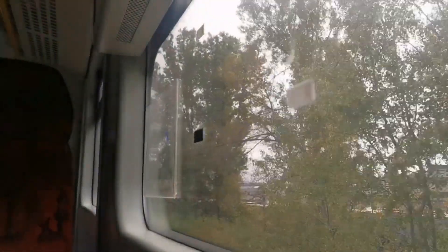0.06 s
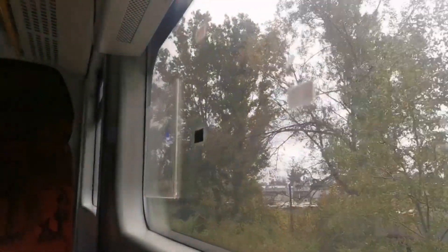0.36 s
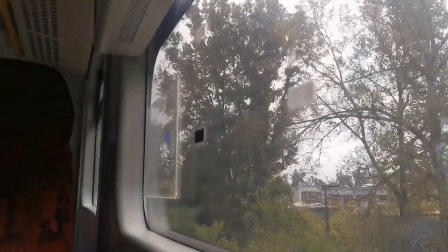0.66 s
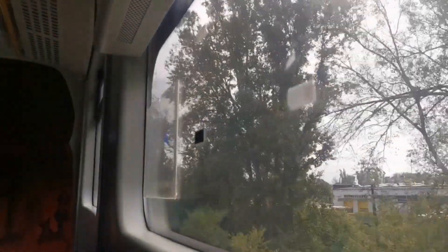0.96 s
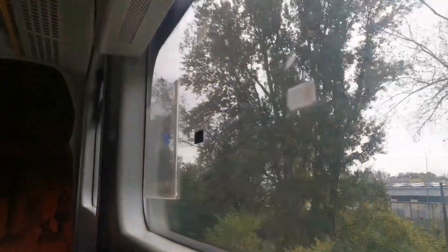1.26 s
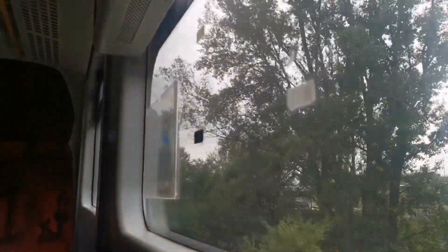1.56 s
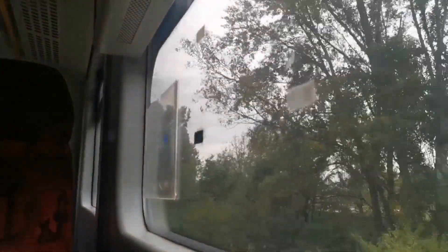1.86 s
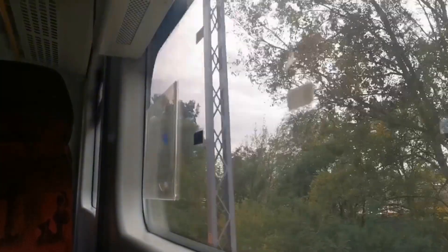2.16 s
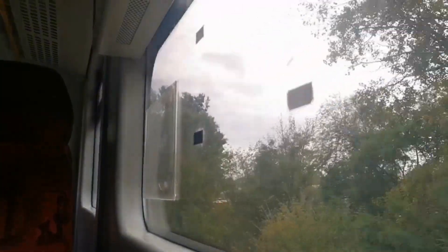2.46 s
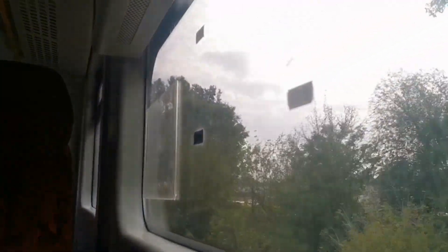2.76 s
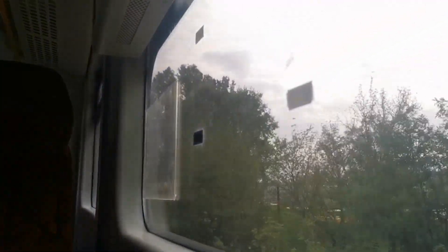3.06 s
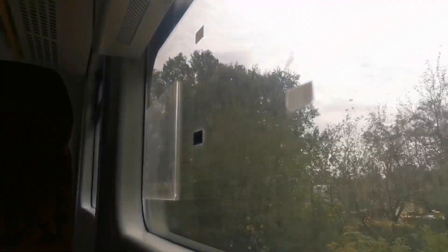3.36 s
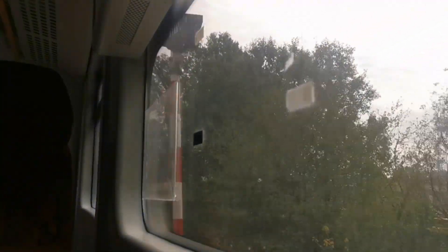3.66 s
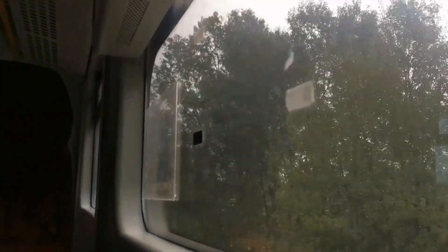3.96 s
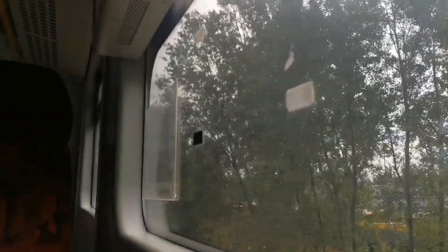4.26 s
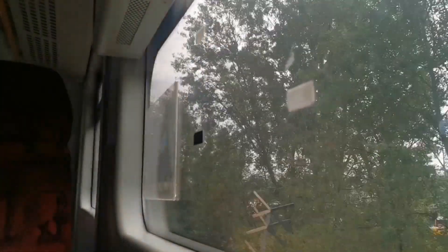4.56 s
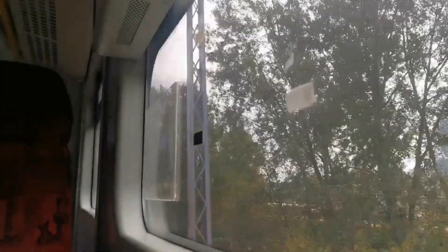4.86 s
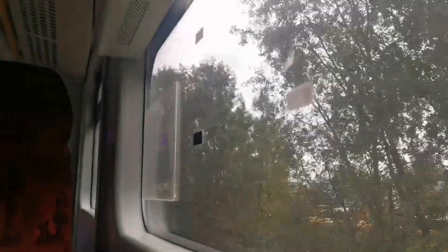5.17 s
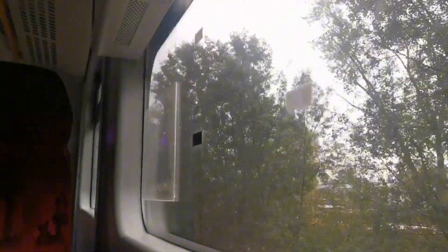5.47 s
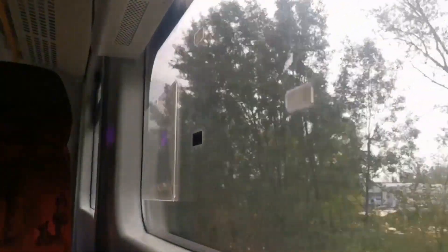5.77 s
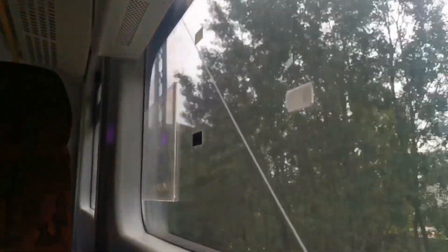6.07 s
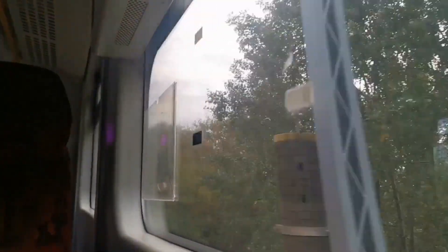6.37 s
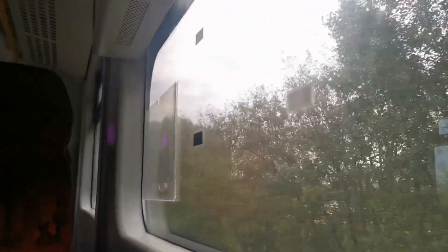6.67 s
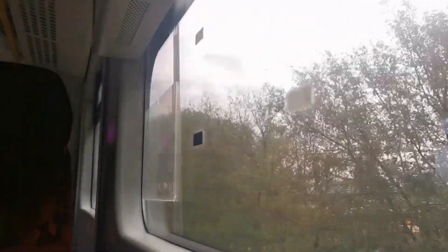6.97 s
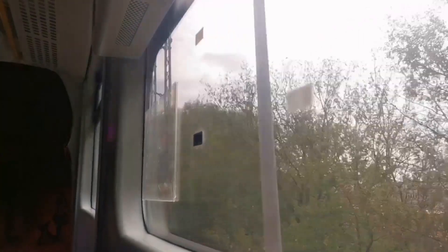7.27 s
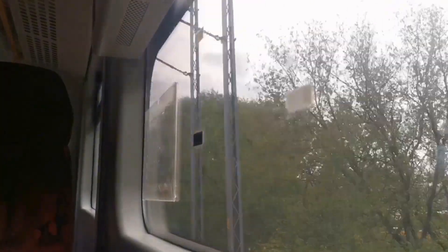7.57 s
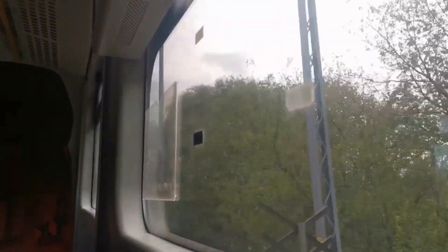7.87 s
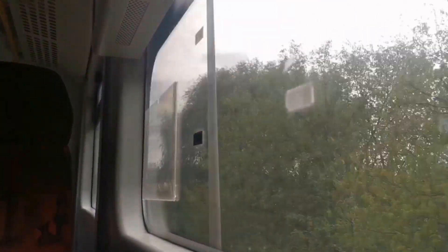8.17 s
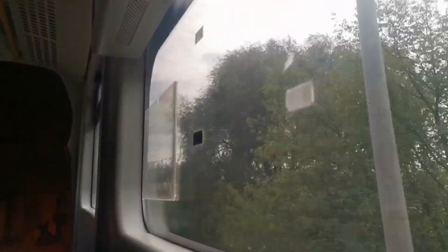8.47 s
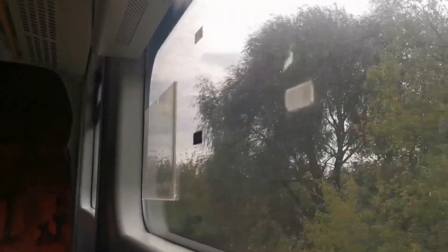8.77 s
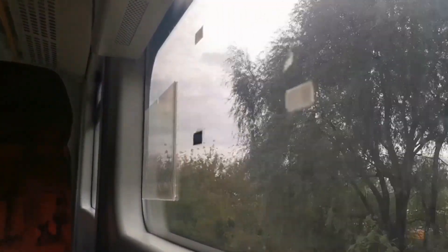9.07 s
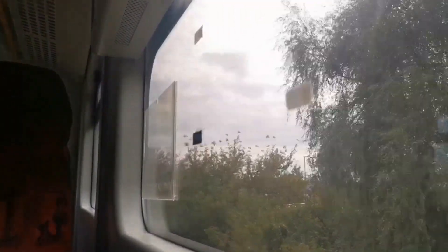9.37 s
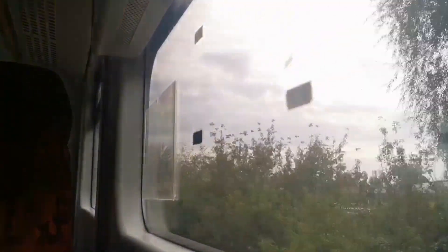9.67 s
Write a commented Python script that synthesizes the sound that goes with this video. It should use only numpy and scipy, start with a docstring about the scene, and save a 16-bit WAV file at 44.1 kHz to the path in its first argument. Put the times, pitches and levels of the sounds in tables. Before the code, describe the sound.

A commuter train's low rumble and electrical hum heard from a window seat, with soft bumps and a loose fitting ticking now and then.

```python
"""Running gear rumbles through the floor and wall panels of an electric commuter train at steady speed.
Heard from a window seat, bumps in the rail make the panels boom, an auxiliary motor and the
mains-fed equipment hum, and an inverter whines high up on the right. The wheels roar dully behind
the glass, a loose fitting ticks now and then, and a thin hiss sits on top."""
import sys
import numpy as np
from scipy import signal
from scipy.fft import rfft, irfft, next_fast_len
from scipy.io import wavfile
from scipy.ndimage import uniform_filter1d, map_coordinates

SR = 44100
rng = np.random.default_rng(int(sys.argv[2]) if len(sys.argv) > 2 else 0)


def wav_record(signal):
    """Record a signal, one row per channel, as 16-bit PCM in the file named by sys.argv[1]."""
    frames = np.transpose(np.atleast_2d(signal))
    bounded = np.clip(frames, -1, 1)
    # unit amplitude maps onto the largest positive 16-bit level
    quanta = np.round(bounded * 32767).astype(np.int16)
    wavfile.write(sys.argv[1], SR, quanta)


N = 433496

# Tone colour of the body's sway, the floor's boom and the walls' drone: freq_hz, relative_db
BODY_SPECTRUM = [(6, -12), (11, 16), (14, 28.5), (21, 31), (27, 29), (33, 24), (42, 27), (52, 6), (65, -51)]
FLOOR_SPECTRUM = [(38, -44), (48, 18), (54, 15.5), (64, 21), (70, 6.5), (77, 15.5), (86, 12.5), (94, 15.5),
                  (104, 13), (125, -51.5)]
WALL_SPECTRUM = [(80, -18.5), (102, -1.5), (122, -0.5), (135, -3.5), (160, -8.5), (180, -7), (197, -2),
                 (217, -5.5), (236, -11), (272, -13.5), (296, -11), (316, -19.5), (345, -23), (450, -73)]
# Wavering notes of wheelsets and gears, set against the noise around them: pitch_hz, relative_db
WHEEL_NOTES = [(14.57, -2), (31.87, -3.5), (33.77, -5.5)]
AXLE_NOTES = [(54.64, -3.5), (63.5, -9), (65.2, -3.5), (81.4, -13.5)]
GEAR_NOTES = [(175.2, -13), (178.4, -12)]
# Level rides for the track's unevenness, the floor's boom and the walls' drone: time_s, gain_db
TRACK_RIDE = [(0.0, 3), (1.65, -7), (2.25, 1), (3.3, -4.7), (4.5, -5), (5.85, 2), (7.2, -1.5), (7.65, 7),
              (8.1, 2.5), (8.4, 10), (9.15, 3.5), (9.83, 2)]
FLOOR_RIDE = [(0.0, -2), (1.05, -3), (1.5, -4), (1.95, -0.5), (2.4, -3), (2.7, 0.8), (3.3, -2.5),
              (3.45, 0.5), (6.15, -1.3), (6.3, -7.1), (6.6, 4), (6.9, -0.5), (7.65, 1.9), (7.8, -3.5),
              (8.25, 1.8), (9.15, 0.8), (9.45, 3.5), (9.83, -1.5)]
WALL_RIDE = [(0.0, -1), (0.45, 0.9), (2.85, -0.73), (5.4, 1.56), (7.05, -1), (9.83, -0.5)]

def rumble(body_db=-32, floor_db=-27, wall_db=-30):
    """The track shakes the body, floor and wall panels; wheelsets and gears add low wavering notes."""
    body_gain = amp(body_db + ride(TRACK_RIDE)) * swelling(depth_db=0.3, rate_hz=5.7)
    sway = body_gain * shaking(BODY_SPECTRUM, WHEEL_NOTES)
    floor_gain = amp(floor_db + ride(FLOOR_RIDE)) * swelling(depth_db=1.3, rate_hz=9)
    boom = floor_gain * shaking(FLOOR_SPECTRUM, AXLE_NOTES)
    wall_gain = amp(wall_db + ride(WALL_RIDE)) * swelling(depth_db=0.93, rate_hz=7)
    drone = wall_gain * shaking(WALL_SPECTRUM, GEAR_NOTES)
    return sway + boom * pan(balance_db=-2) + drone * pan(balance_db=-4.5)


# Panel booms from jolts at the wheels: start_s, pitch_hz, peak_db
BUMPS = [(0.5, 200, -25), (3.76, 190, -26), (4.105, 196, -21), (4.77, 198, -26), (4.86, 196, -26),
         (9.08, 112, -14.5), (9.14, 110, -16.5), (9.215, 178, -20), (9.272, 114, -16.5), (9.295, 185, -19)]

def bumps(rise_s=0.02):
    """Uneven rail jolts the car and a panel booms for a few cycles."""
    out, t = np.zeros(N + SR), np.arange(SR // 2) / SR
    rise = t / rise_s
    swell = rise ** 2 * np.exp(2 * (1 - rise))  # peaks at 1 after rise_s
    for start_s, pitch_hz, peak_db in BUMPS:
        out[round(start_s * SR):][:len(t)] += amp(peak_db) * swell * np.sin(2 * np.pi * pitch_hz * t)
    return out[:N] * pan(balance_db=-1.5)


# Partials of the motor's drone: harmonic, left_db, right_db
MOTOR_PARTIALS = [(1, -22, -22.5), (2, -37.5, -42), (3, -48, -47), (4, -45.5, -41), (5, -52.5, -45),
                  (11, -73, -67.5), (12, -80, -72), (13, -65.5, -55.5)]
# Level ride of that drone: time_s, gain_db
MOTOR_RIDE = [(0.0, 0.6), (2.55, 1), (4.65, -1), (5.1, 1.5), (5.7, -3.0), (9.83, 2.5)]
MOTOR_HZ = 49.02

def motor():
    """The auxiliary induction motor drones, slipping just behind the mains frequency."""
    return amp(ride(MOTOR_RIDE)) * partials(MOTOR_HZ, MOTOR_PARTIALS, waver_db=0.6, drift_rad=0.037,
                                            rate_hz=2.59)


# Low hum, high buzz and rectifier tone of the mains: harmonic, left_db, right_db
HUM_PARTIALS = [(2, -27.5, -26.5)]
BUZZ_PARTIALS = [(17, -77, -67), (26, -75, -73), (48, -83, -80), (49, -85, -72.5), (50, -85, -74),
                 (51, -78, -75), (52, -75.5, -68.8), (54, -78, -77), (70, -83, -80), (72, -78, -68.6),
                 (74, -77, -81), (76, -77, -74), (122, -96, -81)]
RECTIFIER_PARTIALS = [(6, -44.5, -39.5)]

def mains_hum(mains_hz=50, throb_hz=2.3, throb_depth=0.27, throb_peak_s=0.336):
    """Mains-fed gear throbs; its buzz swells with the inverter, its rectifier with the walls' drone."""
    throb = 1 + throb_depth * np.cos(2 * np.pi * throb_hz * (np.arange(N) / SR - throb_peak_s))
    hum = partials(mains_hz, HUM_PARTIALS, waver_db=0.74, drift_rad=0.017, rate_hz=3.4)
    buzz = partials(mains_hz, BUZZ_PARTIALS, waver_db=1.2, drift_rad=0.15, rate_hz=3)
    rectifier = partials(mains_hz, RECTIFIER_PARTIALS, waver_db=1.4, drift_rad=0.1, rate_hz=7.3)
    return throb * hum + amp(0.5 * ride(INVERTER_RIDE)) * buzz + amp(1.43 * ride(WALL_RIDE)) * rectifier


# The inverter's whine and its upper sidebands: harmonic, left_db, right_db
WHINE_PARTIALS = [(12, -82, -68.5), (17, -93, -74), (18, -71.5, -65), (24, -77, -74), (27, -93, -75.5),
                  (30, -77, -50.8), (33, -110, -79), (39, -87, -70.5)]
SIDEBAND_PARTIALS = [(29, -95, -84), (34, -101, -78), (35, -97, -75), (36, -76, -58.9), (37, -115, -73),
                     (38, -104, -78)]
# Level rides of the two: time_s, whine_gain_db, sideband_gain_db
INVERTER_RIDE = [(0, -1.5, -7), (1, 1.5, -6), (2.2, 0.2, -3), (3, 0.7, -6), (4.6, 0.5, 2), (5.5, 1, 1),
                 (6.35, 0.1, 5), (7.75, -0.5, -2), (8.3, -2.8, 2), (9.3, -0.3, 0), (9.83, -3.5, -5)]

def inverter(base_hz=400.046):
    """The inverter whines in high harmonics that reach the right ear first."""
    whine = partials(base_hz, WHINE_PARTIALS, waver_db=0.45, drift_rad=0.15, rate_hz=20, lag_s=6e-5)
    sidebands = partials(base_hz, SIDEBAND_PARTIALS, waver_db=0.6, drift_rad=0.2, rate_hz=4, lag_s=2e-5)
    return amp(ride(INVERTER_RIDE)) * whine + amp(ride(INVERTER_RIDE, column=2)) * sidebands


# Muffled wheel roar and ring of the rail: freq_hz, left_db_per_hz, right_db_per_hz
ROAR_SPECTRUM = [(202, -110, -110), (339, -74, -70), (350, -69, -64.5), (385, -76, -67),
                 (554, -79.5, -68.5), (753, -85, -75), (804, -85.5, -73), (980, -86, -81),
                 (1130, -88.5, -76.5), (1170, -90, -82), (1292, -89, -78), (1613, -95, -88),
                 (2260, -96.5, -91.5), (4800, -140, -140)]
RAIL_SPECTRUM = [(350, -140, -140), (686, -85, -82), (787, -95, -76.5), (945, -97, -85), (1700, -140, -140)]

def rolling(rough_centre_s=7.34, rough_half_s=0.24, rough_lift_db=10.5):
    """Wheels roar behind the glass; the rail rings louder on uneven track and a corrugated stretch."""
    corrugation = np.exp(-((np.arange(N) / SR - rough_centre_s) / rough_half_s) ** 2)
    roar = swelling(depth_db=0.41, rate_hz=13) * rush(ROAR_SPECTRUM)
    rail = amp(0.4 * ride(TRACK_RIDE) + rough_lift_db * corrugation) * rush(RAIL_SPECTRUM)
    return roar + rail


# Hits of the loose fitting: start_s, snap_db, ring_db, clack_db, balance_db, t60_s, attack_s
TICKS = [(3.635, -57, -61, -73, -11, .22, .012), (6.422, -62, -69, -80, -10, .12, .001),
         (6.624, -60, -67, -78, -15, .15, .005), (7.354, -61, -69, -82, -14, .05, .001),
         (7.862, -60, -66, -80, -14, .05, .002), (7.886, -56, -65, -80, -14, .03, .002),
         (7.894, -50, -60, -78, -12, .03, .002), (7.906, -55, -66, -80, -14, .05, .002),
         (8.35, -52, -54.5, -57, -7, 0.17, .0005), (8.491, -59, -56, -43.5, -9.5, 0.31, 0.0017),
         (8.894, -63, -71, -85, -14, .06, .001)]
# Tone colour of a tick's bright snap, metallic ring and low clack: freq_hz, relative_db
SNAP_SPECTRUM = [(4000, -30), (8000, -10), (11000, -9), (13000, -1), (16000, -8)]
RING_SPECTRUM = [(3500, -35), (4600, -1), (5400, 1), (5900, -7), (6800, 1), (7400, -8), (8100, -6),
                 (9500, -9), (14000, -29)]
CLACK_SPECTRUM = [(300, -20), (600, 4), (780, 18), (1050, 1), (1400, 7), (2000, -1), (2400, -3), (2900, -1),
                  (3800, -1), (4400, -3), (5100, -2), (6700, -9), (9000, -22), (16000, -36)]
# Modes of the panel behind the fitting, set against the clack: pitch_hz, relative_db, t60_s
CLACK_MODES = [(720, -4, .5), (850, -5, .45), (1362, -14, .42)]

def loose_fitting(ping_hz=5360):
    """Each contact snaps; harder ones also ring the metal and clack the panel behind it."""
    out, t = np.zeros((2, N + SR)), np.arange(SR // 2) / SR
    burst = lambda spectrum: coloured(rng.standard_normal((2, len(t))), spectrum)
    ping = 0.5 * np.sin(2 * np.pi * ping_hz * t)
    panel = sum(amp(db - 60 * t / t60) * np.sin(2 * np.pi * hz * t) for hz, db, t60 in CLACK_MODES)
    for start_s, snap_db, ring_db, clack_db, balance_db, t60_s, attack_s in TICKS:
        snap = amp(snap_db) * burst(SNAP_SPECTRUM)
        ring = amp(ring_db) * (burst(RING_SPECTRUM) + ping)
        clack = amp(clack_db) * burst(CLACK_SPECTRUM)
        attack = 1 - np.exp(-t / attack_s)
        decay = amp(-60 * t / t60_s) + 0.5 * amp(-60 * t / 0.022)  # cabin tail and direct crack
        tick = attack * (decay * (snap + ring + clack) + amp(clack_db) * panel)
        out[:, round(start_s * SR):][:, :len(t)] += pan(balance_db) * tick
    return out[:, :N]


# Cabin hiss and the inverter's fizz: freq_hz, left_db_per_hz, right_db_per_hz
HISS_SPECTRUM = [(1630, -120, -120), (2690, -93.5, -91), (3230, -97, -95), (4220, -101, -99),
                 (4570, -99.7, -95.5), (5390, -104, -93.8), (5900, -106, -100.5), (6780, -106, -94),
                 (7740, -116, -106), (9000, -135, -122), (15600, -140, -140)]
FIZZ_SPECTRUM = [(6500, -140, -140), (8000, -111, -109), (9300, -104, -103), (11000, -116, -102),
                 (12100, -122, -96), (13800, -130, -104), (15600, -124, -97.5)]

def hiss(flutter_depth=0.1):
    """A thin hiss pulses twice a motor turn; above it a fizz rises and falls with the inverter's whine."""
    flutter = 1 + flutter_depth * np.sin(2 * np.pi * MOTOR_HZ * np.arange(N) / SR)
    fizz = amp(0.6 * ride(INVERTER_RIDE)) * rush(FIZZ_SPECTRUM)
    return swelling(depth_db=0.63, rate_hz=14) * (flutter * rush(HISS_SPECTRUM) + fizz)


# Stereo image of the cabin, mono in the bass and wide above: freq_hz, left_right_correlation
CABIN_IMAGE = [(60, 1), (160, 0.99), (280, 0.9), (450, 0.54), (740, -0.2), (1200, -0.058), (1800, -0.18),
               (5000, 0.031)]

def cabin_noise():
    """White stereo noise of 0 dB per Hz: long waves reach both ears alike, short ones do not."""
    def mid_side_gains(hz):
        angle = np.arccos(np.clip(along(CABIN_IMAGE, hz), -1, 1)) / 2
        return np.array([np.cos(angle), np.sin(angle)])
    mid, side = filtered(rng.standard_normal((2, N)), mid_side_gains)
    return np.array([mid + side, mid - side]) * np.sqrt(SR / 2)


def shaking(spectrum, notes):
    """Coloured vibration noise with a few notes in it, levelled to a short-term rms of 1."""
    x = coloured(cabin_noise(), spectrum)
    x += sum(amp(db) * tone(hz, waver_db=2, drift_rad=0.36, rate_hz=1.483) for hz, db in notes)
    power = uniform_filter1d(np.mean(x ** 2, axis=0), size=SR // 6)
    power = uniform_filter1d(power, size=SR // 9)
    return x / np.sqrt(np.abs(power) + 1e-12)


def rush(spectrum):
    """Cabin noise with its own spectrum at each ear."""
    return filtered(cabin_noise(), lambda hz: amp([along(spectrum, hz), along(spectrum, hz, column=2)]))


def partials(base_hz, table, **settings):
    """Harmonics of one pitch, each with its own place in the cabin's standing waves."""
    return sum(amp([[left], [right]]) * tone(round(k) * base_hz, **settings) for k, left, right in table)


def tone(hz, waver_db, drift_rad, rate_hz, lag_s=0):
    """A stereo sine near rms 1 whose level and phase wander; the left ear gets it lag_s late."""
    t = np.arange(N) / SR - np.array([[lag_s], [0]])
    phase = 2 * np.pi * (hz * t + rng.random()) + drift_rad * wobble(rate_hz)
    return np.sqrt(2) * swelling(waver_db, rate_hz) * np.sin(phase)


def swelling(depth_db, rate_hz):
    """A gain that wanders by chance."""
    return amp(depth_db * wobble(rate_hz))


def wobble(rate_hz):
    """A smooth random curve, rate_hz knots a second."""
    knots = np.linspace(0, N * rate_hz / SR, N // 256)
    coarse = map_coordinates(rng.standard_normal(int(knots[-1]) + 4), [knots])
    return np.interp(np.arange(N), np.linspace(0, N, len(knots)), coarse)


def coloured(noise, spectrum):
    """Noise shaped by a spectrum and scaled to rms 1."""
    x = filtered(noise, lambda hz: amp(along(spectrum, hz)))
    return x / np.sqrt(np.mean(x ** 2) + 1e-20)


def filtered(x, response):
    """Zero-phase EQ; response gives the gain at each frequency."""
    size = x.shape[-1]
    padded = next_fast_len(size + SR // 2)
    return irfft(rfft(x, padded) * response(np.fft.rfftfreq(padded, 1 / SR)), padded)[..., :size]


def along(rows, hz, column=1):
    """One column of a frequency table, read on a log axis."""
    table = np.transpose(rows)
    return np.interp(np.log(hz + 1), np.log(table[0] + 1), table[column])


def ride(rows, column=1):
    """A fader move: one column of a time table, drawn out to every sample."""
    table = np.transpose(rows)
    return np.interp(np.arange(N) / SR, table[0], table[column])


def pan(balance_db):
    """Left and right gains; a negative balance leans right."""
    return amp([[balance_db / 2], [-balance_db / 2]])


def amp(db):
    """Decibels to gain."""
    return 10 ** (np.asarray(db) / 20)


def scene():
    """Everything heard from a window seat."""
    return rumble() + bumps() + motor() + mains_hum() + inverter() + rolling() + loose_fitting() + hiss()


def record(dry):
    """Fades of a few milliseconds at both ends and a hard cut of the top treble."""
    cutoff_hz = 15790
    fade = signal.windows.tukey(N, 0.0015)
    return filtered(dry * fade, lambda hz: hz < cutoff_hz)


dry = scene()
out = record(dry)
wav_record(out)
```